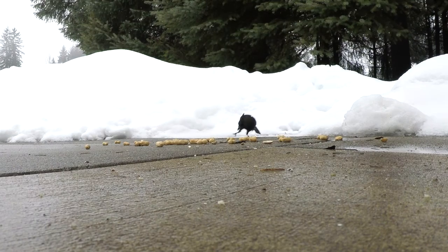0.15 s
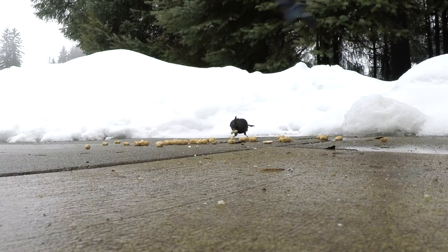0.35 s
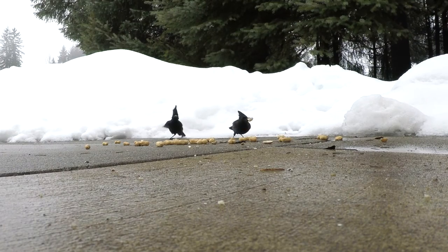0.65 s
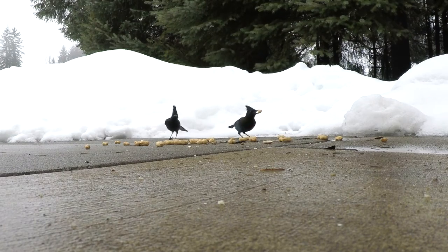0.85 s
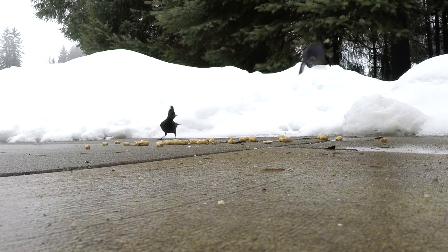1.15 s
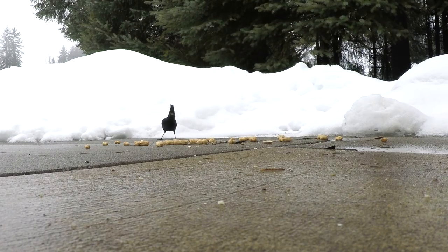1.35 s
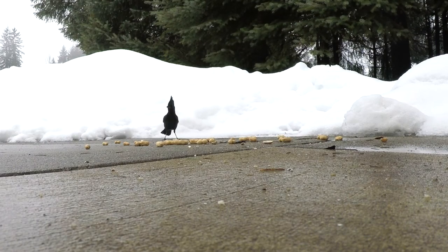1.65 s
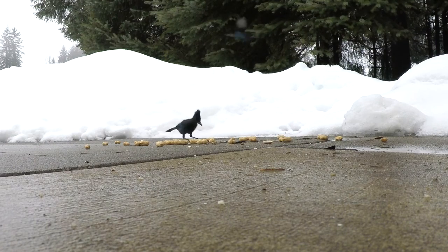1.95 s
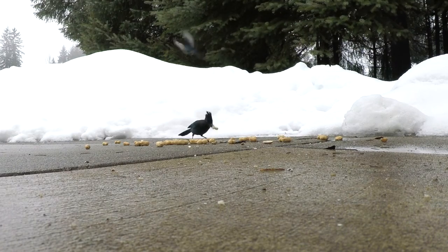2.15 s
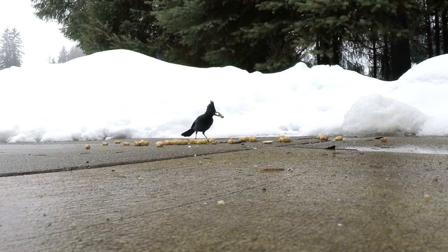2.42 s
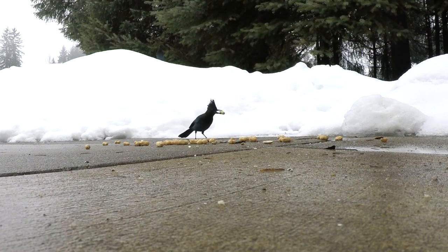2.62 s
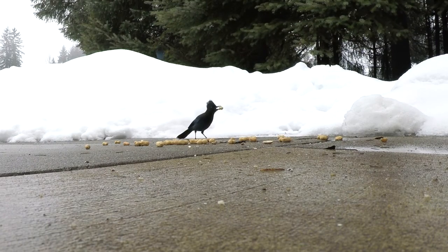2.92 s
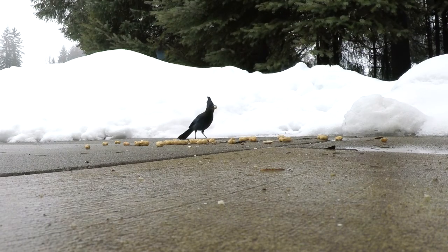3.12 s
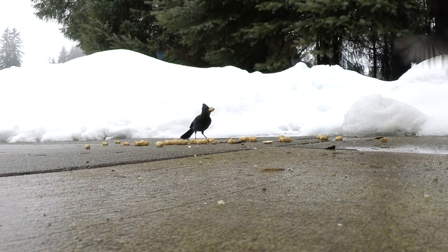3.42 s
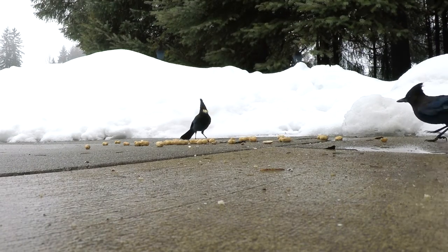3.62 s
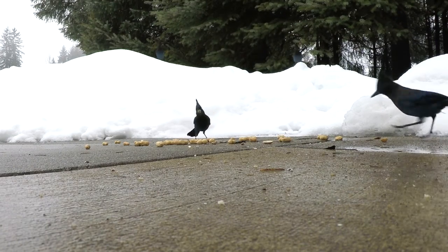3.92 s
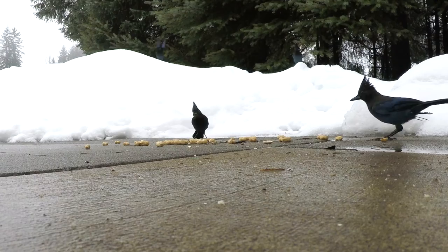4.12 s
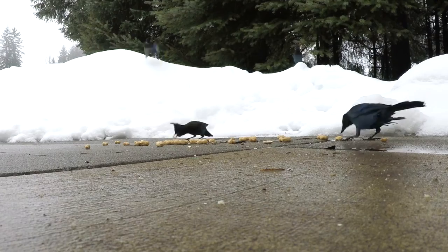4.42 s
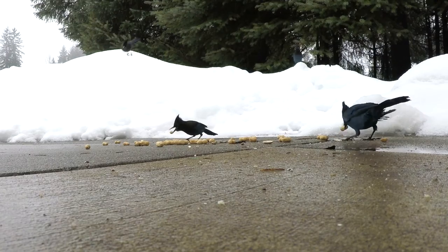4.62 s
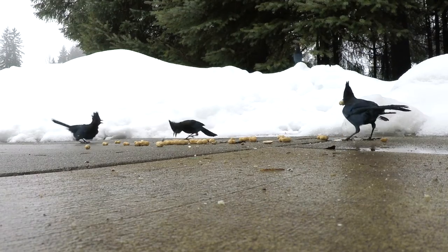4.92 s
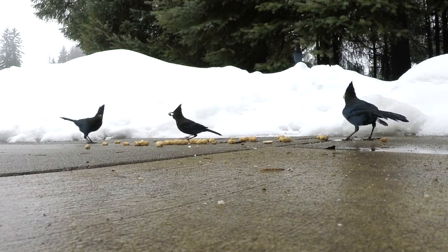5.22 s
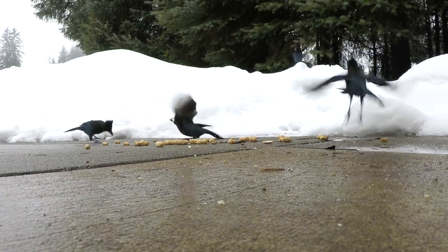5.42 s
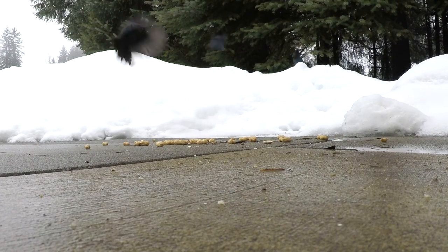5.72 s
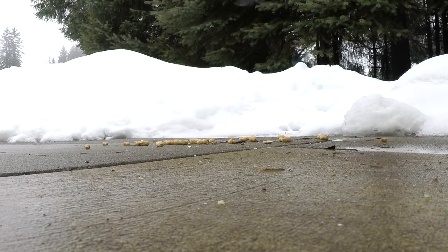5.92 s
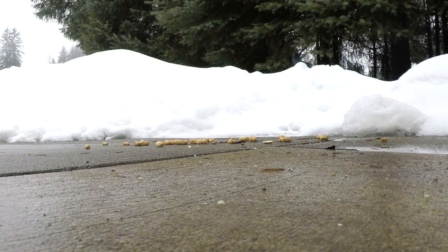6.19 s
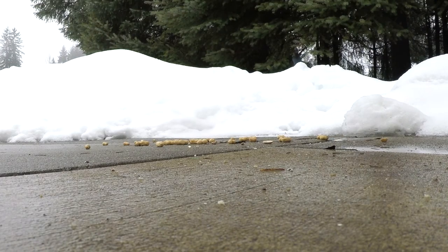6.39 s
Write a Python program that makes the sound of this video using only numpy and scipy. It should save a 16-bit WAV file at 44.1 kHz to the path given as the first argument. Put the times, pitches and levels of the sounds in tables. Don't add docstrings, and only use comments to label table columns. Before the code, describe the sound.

Close stereo sound of jays feeding by snowbanks and trees. Over quiet hissing air, dry drips tick and small hollow pecks and shell taps sound. A wing flutter passes just after one second; a very faint, distant bird whistles from about two and a half. Later come a feathery wing swish, three short raspy squawks in quick succession, and a loud fluttering takeoff with hard clicks, fading to airy hiss.

```python
import sys
import numpy as np
from scipy import signal
from scipy.fft import rfft, irfft
from scipy.io import wavfile

SR = 44100
rng = np.random.default_rng(int(sys.argv[2]) if len(sys.argv) > 2 else 0)


def boost(x):
    u = np.asarray(x, float) / 20
    return 10 ** u


def unload_audio(sound):
    columns = np.transpose(np.atleast_2d(sound))
    steps = np.round(np.clip(columns, -1, 1) * 32767)
    wavfile.write(sys.argv[1], SR, steps.astype(np.int16))


N = 288855
TIME = np.arange(N) / SR
SIDES = np.array([[1], [-1]])

# (time [s], level over the calm [dB])
AIR_STIR = [(0, 0), (.3, 1), (.89, 0), (1.2, 1.5), (1.4, 1), (2.4, 0), (3.4, 1), (4.6, 0.5), (4.9, 1.5),
            (5.46, 0.5), (5.7, 5.5), (5.95, 1), (6.2, 0.8), (6.55, 1.5)]
# (frequency [Hz], density [dB per Hz])
RUMBLE_SPECTRUM = [(76, -79), (130, -3.5), (160, 4), (203, 0.5), (736, -5), (896, -6), (1010, -6.5),
                   (1750, -14.5), (1970, -18.5), (3000, -25), (3900, -45), (6600, -120)]
HISS_SPECTRUM = [(710, -13), (1200, 2.5), (2480, -6.5), (4960, -10.5), (7570, -4.5), (9010, -6),
                 (10500, -9), (12300, -19.5), (14000, -18), (15200, -57), (16000, -57)]
# (frequency [Hz], left-right likeness [1])
AIR_LIKENESS = [(60, 0.35), (110, -0.95), (200, 0.25), (380, -0.6), (700, -0.76), (1290, -0.83),
                (2380, -0.46), (4400, 0.45), (8120, -0.51), (15000, -0.1)]
# (frequency [Hz], left lead [rad])
AIR_LEAD = [(0, -1), (520, -3), (1210, -3.5), (1980, -4), (2930, -5.5), (4310, -7), (7240, -8), (8960, -8),
            (11200, -8.5), (13200, -25), (13700, -29), (14400, -28), (14800, -30), (15900, -38)]

# (time [s], peak level [dB], centre [Hz])
DRIPS = [(0.031, -39, 5990), (0.131, -29, 8700), (0.207, -32, 6800), (0.438, -26.5, 8450),
         (0.6276, -29, 8000), (0.7449, -26.5, 7350), (1.0522, -27, 7840), (1.361, -29.5, 8300),
         (1.407, -36, 8500), (1.5424, -39, 8540), (1.666, -30, 7750), (1.7524, -33, 9800),
         (1.846, -33.5, 7500), (1.9736, -30.5, 8600), (2.261, -35.5, 7140), (2.28, -31, 6140),
         (2.587, -27.5, 7550), (2.774, -34, 5700), (2.8953, -30.5, 7050), (3.201, -33, 6350),
         (3.509, -29, 7560), (3.7286, -45, 7130), (3.8148, -30.5, 6460), (4.122, -31.5, 6760),
         (4.3281, -31, 8650), (4.414, -35, 8100), (4.428, -35, 6450), (4.4779, -29, 6000),
         (4.654, -37, 7770), (4.859, -28, 8700)]
# (time [s], peak level [dB], centre [Hz], hollow knock level [dB], knock [Hz])
PECKS = [(0.2928, -37, 6000, 0, 1800), (1.1388, -28.5, 8400, -4.5, 1560), (1.17, -33, 3430, -2, 1200),
         (2.101, -30, 7100, -13, 1860), (2.181, -49, 7100, 8, 1690), (2.4016, -28.5, 5700, -8, 1860),
         (2.7651, -34, 5780, -7, 1860), (2.9818, -34.5, 7470, -0.5, 1630), (3.2598, -35, 5090, -9, 1860),
         (3.3755, -31.5, 3750, -10, 1860), (3.476, -33, 3700, -4.5, 1930), (3.5505, -36, 7490, -2, 1480),
         (3.8085, -40, 3000, -7, 2200), (5.5225, -45, 4700, 11, 800), (3.9487, -38, 2820, -9, 2000),
         (4.362, -33, 7760, -10, 1850), (4.7335, -31.5, 6600, -15, 1860), (4.7615, -30.5, 6000, 0, 1620),
         (4.871, -44.5, 2470, 12.5, 1870), (4.9294, -32.5, 6660, -3, 1630)]
# (time [s], peak level [dB], centre
# [Hz], hollow knock level [dB], knock [Hz])
HARD_TAPS = [(0.2948, -29, 8700, -6, 1840), (.2966, -28, 5500, 3, 1800), (.2972, -31, 7500, -3, 1900),
             (0.3022, -35, 8500, 1, 1900), (.3072, -32, 7800, -14, 1840), (0.309, -31, 4500, -19, 1840),
             (3.564, -41, 8000, -17, 1500), (3.5763, -26.5, 3700, -12, 2200),
             (3.7644, -33, 3000, -16, 1900), (3.7659, -27, 3660, -10, 1960), (3.775, -35, 3000, -3, 2270),
             (2.174, -40, 2600, -5, 2300), (2.205, -44, 1900, -2, 1300), (2.274, -41, 2600, -6, 2300),
             (2.405, -29.5, 3480, -13, 1900), (3.3815, -39.5, 2300, -4, 2200),
             (3.467, -41, 3000, -6, 2000), (3.4745, -34, 3900, -10, 2000), (3.9267, -43, 4500, -4, 2530),
             (3.937, -41, 3000, -5, 2200), (3.948, -39, 3000, -6, 2600), (3.957, -39, 3000, -4, 2400),
             (5.4638, -35, 9040, -16, 1860), (5.4815, -30, 14700, -23, 1890),
             (5.5257, -35, 9290, -8, 1880), (5.557, -36, 9550, -16, 1860), (5.5805, -28, 7500, -10, 2200),
             (5.8145, -20.5, 7100, -21, 1860), (5.887, -24, 7800, -17, 1860)]
# (time [s], peak level [dB], centre [Hz])
SCUFFS = [(0.311, -35, 7310), (0.76, -39, 7300), (0.746, -44, 3000), (1.247, -36.5, 8990),
          (2.608, -40, 2540), (3.3806, -42, 3850), (3.466, -36, 3800), (3.778, -41, 2690),
          (3.829, -38, 8300), (4.4873, -38, 3540), (4.773, -33.5, 3390), (5.593, -23.5, 7060),
          (6.043, -32, 7460), (6.484, -28, 7100)]
# (time [s], peak level [dB], centre [Hz], hollow knock level [dB], 60 dB decay time [s])
TAKEOFF_TICKS = [(5.481, -27, 8650, -10, 0.0073), (5.529, -33, 5000, 3, 0.0087),
                 (5.5439, -12.5, 6300, -15, 0.0045), (5.577, -21.5, 8500, -8, 0.022),
                 (5.656, -30, 8000, -5, .006), (5.667, -22.5, 8250, -13, 0.007),
                 (5.723, -25, 5920, -5, 0.0054), (5.7383, -17.5, 7500, -18, 0.0092),
                 (5.8149, -26, 7850, -16, 0.0062), (5.8856, -31, 8300, -17, 0.0098),
                 (5.951, -25, 7900, -23, 0.0077), (6.0326, -23, 7860, -19, 0.0079),
                 (6.2704, -29.5, 6700, -14, 0.015), (6.337, -33.5, 8000, -13, .011)]

# (time [s], push level [dB], feather rustle level [dB])
BEATS = [(.123, -45, -52), (.195, -43.5, -54), (0.296, -38.5, -50), (1.104, -37.5, -51), (1.156, -33, -63),
         (1.181, -57, -69), (1.208, -37.5, -70), (1.234, -35, -66), (1.257, -64, -64), (1.313, -34.5, -52),
         (1.384, -36, -66), (1.464, -39, -59), (1.494, -55, -65), (1.55, -41, -62), (3.449, -40.5, -53),
         (3.55, -38.5, -46), (4.421, -39.5, -48), (4.957, -33, -25.5)]
# (time [s], push level [dB], feather rustle level [dB], length [s])
TAKEOFF_BEATS = [(5.38, -41, -70, .012), (5.407, -36, -65, 0.036), (5.454, -41, -48.5, 0.04),
                 (5.52, -30, -58, 0.031), (5.568, -40, -68, 0.028), (5.586, -35, -55, 0.02),
                 (5.623, -31, -48, 0.012), (5.646, -31.5, -53, 0.023), (5.678, -35, -52, 0.014),
                 (5.69, -35.5, -61, 0.05), (5.74, -36.5, -53, 0.028), (5.786, -33, -53, 0.016),
                 (5.808, -29, -45.5, 0.027), (5.866, -35, -52, 0.029), (5.893, -36.5, -49.5, 0.052),
                 (5.949, -39, -50, 0.022), (5.967, -37, -53, 0.02), (5.993, -39.5, -60, 0.023),
                 (6.013, -36.5, -55, 0.032), (6.055, -39, -53, 0.028), (6.116, -35, -57, 0.031),
                 (6.337, -49, -46.5, 0.042), (6.43, -49, -54, 0.025)]
# (frequency [Hz], density [dB per Hz])
PUFF_SPECTRUM = [(35, -67), (60, -39), (107, -79), (147, -15), (220, -9), (559, -8.5), (610, -6.5),
                 (767, -14), (1750, -18.5), (4000, -37), (5200, -71), (8800, -120)]
FEATHER_SPECTRUM = [(1760, -18), (3000, -8), (4740, -8.5), (7600, 0.5), (8870, -1), (11800, -19),
                    (13300, -22), (15000, -38)]
# (frequency [Hz], left-right likeness [1])
WING_LIKENESS = [(60, 0.32), (130, 0.97), (290, 0.83), (640, 0.16), (1410, 0.0037), (3100, 0.051),
                 (6820, -0.065), (15000, -0.059)]
# (frequency [Hz], left over right [dB])
WING_BALANCE = [(60, -0.5), (110, 3), (200, -9), (380, 15), (700, 3), (1290, -9.5), (2380, -3), (4400, 0),
                (8120, -3.5), (15000, 9)]
# (frequency [Hz], left lead [rad])
WING_LEAD = [(0, -13), (340, -0.1), (780, 1.5), (1810, -1.5), (2840, 4.5), (4310, -14), (8270, 0.5),
             (11000, -21.5), (12100, -12), (13000, -4), (14600, 4), (14800, 2.2), (15400, -0.4),
             (15900, 0.5)]
# (time [s], peak level [dB], frequency [Hz], width [s])
VORTICES = [(1.1693, -46, 197, 0.01), (1.1898, -42, 261, 0.0033), (1.221, -46, 331, 0.0039),
            (1.239, -46, 308, 0.004), (1.2545, -46, 260, 0.0038), (1.3121, -39, 196, 0.0095),
            (1.3306, -41, 329, 0.0046), (1.4029, -39, 210, .0065), (1.4717, -40, 220, 0.0067),
            (1.5047, -42, 270, 0.0086), (5.385, -36, 554, 0.0023), (5.3877, -36, 300, 0.0064),
            (5.4008, -37, 226, 0.01), (5.412, -37, 272, .007), (5.5265, -34, 478, 0.0046),
            (5.5344, -38, 242, .0066), (5.548, -36, 325, .005), (5.574, -34, 293, 0.0065),
            (5.5975, -42, 540, 0.0046), (5.6, -34, 271, 0.0068), (5.626, -28, 244, 0.0085),
            (5.6755, -25, 310, 0.0033), (5.691, -29, 235, 0.015), (5.7106, -36, 275, 0.0033),
            (5.794, -35, 263, 0.0058), (5.8167, -42, 225, 0.0038), (5.826, -36, 203, 0.015),
            (5.883, -39, 235, 0.004), (5.901, -34, 222, 0.017), (5.9754, -35, 280, 0.0084),
            (5.9855, -34, 200, 0.0097), (6.004, -36, 334, .005), (6.0615, -35.5, 216, 0.01)]

# (time [s], level [dB])
FALLING_NOTES = [(2.413, -70), (2.533, -65), (2.646, -62), (2.766, -63), (2.889, -66), (3.010, -63.5),
                 (3.132, -62), (3.253, -67)]
# (time [s], level [dB])
RISING_NOTES = [(2.612, -66), (2.728, -58), (2.849, -62), (2.969, -60), (3.091, -62), (3.212, -59)]
# (frequency [Hz], 60 dB decay time [s])
ECHO_T60 = [(800, 0.25), (2000, 0.048), (4000, 0.11), (7000, 0.28), (11000, 0.34)]

# (time [s], level [dB])
CALLS_AT = [
    (4.9505, -18),
    (5.0804, -18.5),
    (5.209, -18.5),
]
# (time from onset [s], upper pitch [Hz], lower pitch [Hz], effort [dB], beak opening [dB])
CALL_COURSES = [
    [(0, 1474, 1339, -6.5, 2), (.012, 1798, 1448, 8.5, -10), (.017, 2103, 1517, 4, -4),
     (.023, 1857, 1640, 4.5, 1), (.03, 2160, 1662, -1.5, 2.5), (.037, 2084, 1496, -4.5, 1),
     (.046, 2038, 1126, -1.3, -0.8), (.061, 1470, 822, -6, 0.5), (.066, 1400, 720, -37, 25)],
    [(0, 1400, 1300, -7.5, 10), (.012, 1700, 1396, 6, -4.5), (.0195, 2050, 1500, 7, -1),
     (.026, 1844, 1530, 0, 3), (.032, 2204, 1617, -3, 2), (.038, 2074, 1518, -8, 2.5),
     (.049, 1918, 1153, -1.3, 0.5), (.063, 1460, 850, -5, 2), (.069, 1400, 720, -41, 23)],
    [(0, 1400, 1300, -9, 9.5), (.012, 1744, 1418, 7.5, -4), (.018, 2056, 1491, 6.5, -4),
     (.025, 1850, 1520, 1, -3), (.03, 2176, 1602, -3, 4.5), (.037, 2122, 1488, -6.5, 0),
     (.047, 1999, 1099, -1.1, 0), (.063, 1456, 818, -5.5, 1.5), (.069, 1380, 720, -42, 23)],
]
UPPER_ORDERS = [0.85, 0.6, 0.21, 0.11, 0.2, 0.03]
# (frequency [Hz], left lead [rad])
CALL_LEAD = [(0, 0), (1030, -2.1), (1810, 1.5), (3010, -0.7), (5430, 1.0), (6550, 0.4), (7750, 1.5),
             (10100, 1.1), (10300, 1.4), (10800, 0.0), (12000, 0.2), (12200, 1.0), (12700, 0.1),
             (15900, -0.1)]
# (frequency [Hz], left over right [dB])
CALL_BALANCE = [(60, 0.5), (110, 1.0), (200, 1.5), (380, 1.0), (700, 0.0), (1290, -5.0), (2380, 1.5),
                (4400, -1.0), (8120, -1.5), (15000, 0.0)]

# (frequency [Hz], density [dB per Hz])
SELF_NOISE_SPECTRUM = [(12, -27), (20, -12), (40, 5), (54, -15), (70, -2.5), (86, -10), (110, -13),
                       (140, -41), (240, -120)]


def rms_one(x):
    return x / np.sqrt(np.mean(x ** 2) + 1e-20)


def at_hz(points, hz):
    table = np.array(points)
    return np.interp(np.log(hz), np.log(table[:, 0]), table[:, 1])


def drift(rate):
    r = np.exp(-80 * np.pi * rate / SR)
    coarse = rng.standard_normal(N // 40 + 2002)
    slow = rms_one(signal.lfilter([1], [1, -2 * r, r * r], coarse)[2000:])
    return np.interp(np.arange(N) / 40, np.arange(len(slow)), slow)


def resonator(hz, width):
    r = np.exp(-np.pi * width / SR)
    return [(1 - r * r) / 2, 0, (r * r - 1) / 2], [1, -2 * r * np.cos(2 * np.pi * hz / SR), r * r]


def resonance(x, hz, width):
    return signal.lfilter(*resonator(hz, width), x)


def double_resonance(x, hz, width):
    return resonance(resonance(x, hz, width), hz, width)


def coloured(spectrum, likeness):
    hz = np.fft.rfftfreq(N, 1 / SR) + 1
    mid, side = rfft(rng.standard_normal((2, N)))
    alike = np.clip(at_hz(np.abs(likeness), hz), 0, 1)
    both = np.sqrt(1 + alike) * mid + np.sqrt(1 - alike) * side * SIDES
    return rms_one(irfft(boost(at_hz(spectrum, hz)) * both, N))


def placed(x, balance, lead):
    hz = np.fft.rfftfreq(N, 1 / SR) + 1
    shade = boost(at_hz(balance, hz) * SIDES / 2)
    delay = np.exp(.5j * np.interp(hz, *np.transpose(lead)) * SIDES)
    return irfft(rfft(x) * shade * delay, N)


def air():
    stir_db = np.interp(TIME, *np.transpose(AIR_STIR))
    swell_db = .6 * drift(12)
    drips_db = .8 * drift(16) + .6 * drift(90)
    rumble = boost(-46.5 + stir_db + swell_db) * coloured(RUMBLE_SPECTRUM, AIR_LIKENESS)
    hiss = boost(-53.5 + 1.62 * stir_db + drips_db) * coloured(HISS_SPECTRUM, AIR_LIKENESS)
    balance = [(100, 0.26), (400, -0.2), (1300, -0.69), (8000, -1.5)]   # (frequency [Hz], left over right [dB])
    return placed(rumble + hiss, balance, AIR_LEAD)


def contacts():
    usual_knock_hz = 1860
    # left over right [dB], decay time [s], scattered tail, broad share, grit
    drips = [(*row, -24, usual_knock_hz, -1.5, .004, .36, .2, 1) for row in DRIPS]
    pecks = [(*row, -4, .003, .32, .3, 1) for row in PECKS]
    quills = [(*row, usual_knock_hz, -.6, t60, .15, .35, 1) for *row, t60 in TAKEOFF_TICKS]
    scuffs = [(*row, -18, usual_knock_hz, -1.4, .033, .33, .44, 1) for row in SCUFFS]
    taps = [(*row, -1.8, .0035, .25, .4, .3) for row in HARD_TAPS]
    return drips + pecks + quills + scuffs + taps


def ticks():
    out, t = np.zeros((2, N + 3000)), np.arange(3000) / SR
    lead = int(.0015 * SR)
    for s, db, hz, knock_db, knock_hz, pan_db, t60, tail, broad, grit in contacts():
        noise = rng.standard_normal((3, len(t)))
        decay = boost(-60 * np.abs(t - lead / SR) / max(t60, .003))
        scattered = tail * boost(-60 * t / 0.17)
        strike = grit * (noise[0] + 1.5 * noise[1:]) * (decay + scattered)
        strike[:, lead] += 8
        bright = resonance(strike, hz, 0.21 * hz) + broad * resonance(strike, 2150, 7100)
        knock = double_resonance(strike, knock_hz, 0.65 * knock_hz)
        sound = bright / np.abs(bright).max() + boost(knock_db) * knock / np.abs(knock).max()
        i = round(s * SR) - lead // 2
        out[:, i:i + len(t)] += boost(db - 1.0 + pan_db * SIDES / 2) * sound
    return signal.sosfilt(signal.butter(3, 11000, fs=SR, output="sos"), out[:, :N])


def wings():
    push, rustle, t = np.zeros(N + 9000), np.zeros(N + 9000), np.arange(9000) / SR
    landing_beats = [(*row, 0.025) for row in BEATS]
    for s, push_db, rustle_db, length in landing_beats + TAKEOFF_BEATS:
        u = t / max(length, .008)
        i = round((s - .006) * SR)
        push[i:i + len(t)] += boost(push_db - 8.0) * 3.0 * u * np.exp(-1.3 * u ** 1.23)
        rustle[i:i + len(t)] += boost(rustle_db) * 3 * u * np.exp(-1.5 * u)
    push, rustle = push[:N], rustle[:N]
    thump = double_resonance(rng.standard_normal(N), 202, 118)
    thump /= np.abs(signal.hilbert(thump)) + 0.22 * thump.std()
    gusts = boost(1.5 * drift(120))
    puffs = 0.64 * push * gusts * coloured(PUFF_SPECTRUM, WING_LIKENESS)
    feathers = rustle * boost(2.7 * drift(150)) * coloured(FEATHER_SPECTRUM, WING_LIKENESS)
    thumps = 0.97 * push * thump * boost(1.2 * SIDES)
    return placed(puffs + feathers, WING_BALANCE, WING_LEAD) + thumps


def vortex_snaps():
    out, t = np.zeros(N), np.arange(-1500, 1500) / SR
    for s, db, hz, width in VORTICES:
        start = rng.uniform(0, 2 * np.pi)
        bell = np.exp(-np.log(16) * (t / max(width, .003)) ** 2)
        i = round(s * SR)
        out[i - 1500:i + 1500] += boost(db) * bell * np.cos(2 * np.pi * hz * t + start)
    return out * boost(3 * SIDES / 2)


def echoes(x):
    t, tail = np.arange(SR // 2) / SR, 0
    for hz, t60 in ECHO_T60:
        band = resonance(rng.standard_normal((2, len(t))), hz, 1.4 * hz)
        tail = tail + band * boost(-60 * t / t60)
    tail = tail * (1 - np.exp(-t / 0.0058))
    tail = tail / np.sqrt(np.sum(tail ** 2) / 2)
    return signal.fftconvolve(x[None], tail, axes=1)[:, :N]


def songbird():
    out = np.zeros(N)
    # notes, from [Hz], to [Hz], length [s], bend
    kinds = [(FALLING_NOTES, 6000, 3300, .058, 1.9), (RISING_NOTES, 4350, 5000, .016, 1.0)]
    for notes, from_hz, to_hz, length, bend in kinds:
        u = np.arange(0, 1, 1 / (length * SR))
        pitch = to_hz + (from_hz - to_hz) * (1 - u) ** bend
        slur = np.sin(2 * np.pi * np.cumsum(pitch) / SR)
        envelope = np.clip(np.minimum(12 * u, 4 - 4 * u), 0, 1) * boost(8 * (.5 - u))
        for s, db in notes:
            i = round(s * SR)
            out[i:i + len(u)] += boost(db) * envelope * slur
    out = out * boost(2.2 * drift(90) + 3 * drift(400) + 1.4)
    return out + boost(-4) * echoes(out)


def climbing(x, hz, width, db):
    out, states = x.copy(), np.zeros((2, 2))
    for i in range(0, len(x), 64):
        b, a = resonator(hz[i], width)
        for k in range(2):
            out[i:i + 64], states[k] = signal.lfilter(b, a, out[i:i + 64], zi=states[k])
    return boost(db) * out


def vocal_tract(flow, breathy, t, beak_db):
    throat = boost(2.0 - 61 * t + 0.52) * double_resonance(flow, 2134, 1630)
    beak_hz = 2830 + 37600 * (np.clip(t, .029, .064) - .029)
    beak = boost(beak_db) * climbing(breathy, beak_hz, 1450, 4.2)
    tip_hz = 5740 + 31000 * (np.clip(t, .0018, .03) - .0018)
    tip = climbing(breathy, tip_hz, 1870, 8.9)
    edge = boost(-1.8) * double_resonance(breathy, 10400, 2800)
    return throat - beak + boost(-1.44 - 61 * t) * (tip - edge) + 0.061 * breathy


def calls():
    voice, t = np.zeros(N), np.arange(4000) / SR
    starts = rng.uniform(0, 2 * np.pi, (6, 9))
    join_s = .038
    joined = .04 + (.72 - .04) * np.minimum(t / join_s, 1) ** 1.93

    def phase(hz):
        return 2 * np.pi * np.cumsum(hz * (1 + 0.013 * drift(330)[:len(t)])) / SR

    for (s, db), rows in zip(CALLS_AT, CALL_COURSES):
        at, *columns = np.transpose(rows)
        upper_hz, lower_hz, effort_db, beak_db = [np.interp(t, at, column) for column in columns]
        high, low = phase(upper_hz), phase(lower_hz)
        flow = np.zeros(len(t))
        for a, b in np.ndindex(starts.shape):
            strength = UPPER_ORDERS[a] * joined ** abs(b - 1)
            flow += strength * np.cos(a * high + (b - 1) * low + starts[a, b])
        breathy = flow + (.26 + .4 * joined) * rng.standard_normal(len(t))
        tract = vocal_tract(flow, breathy, t, beak_db)
        tract += 0.088 * joined * resonance(flow, 1380, 380)
        tone_fade = boost(-200 * np.maximum(t - join_s, 0))
        tract += .21 * joined ** 2 * tone_fade * np.cos(low + starts[0, 2])
        envelope = boost(db + 5.5 + effort_db) * np.minimum(t / 0.0045, 1) * (t < at[-1])
        i = round(s * SR)
        voice[i:i + len(t)] += envelope * tract
    rasp = boost(-23) * double_resonance(np.abs(voice) * rng.standard_normal(N), 14000, 1900)
    voice = signal.sosfilt(signal.butter(4, [780, 10600], "band", fs=SR, output="sos"), voice)
    voice = signal.sosfilt(signal.cheby2(8, 25, 11000, fs=SR, output="sos"), voice) + rasp
    return placed(voice, CALL_BALANCE, CALL_LEAD) + boost(-7) * echoes(voice)


def scene():
    return air() + ticks() + wings() + vortex_snaps() + songbird() + calls()


def band_limit(x):
    return signal.sosfilt(signal.butter(12, 16400, fs=SR, output="sos"), x)


def record(dry):
    rounded = 1.6 * np.tanh(dry / 1.6)
    cut = signal.sosfilt(signal.butter(8, 136, "high", fs=SR, output="sos"), rounded)
    cut = signal.sosfilt(signal.cheby2(10, 50, 16000, fs=SR, output="sos"), cut)
    self_noise = boost(-78) * coloured(SELF_NOISE_SPECTRUM, AIR_LIKENESS)
    return band_limit(cut + self_noise)


dry = scene()
out = record(dry)
unload_audio(out)
```